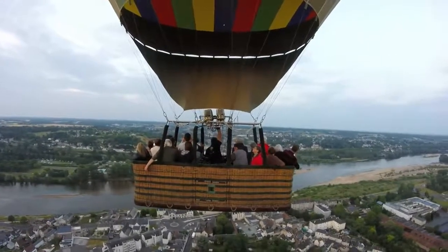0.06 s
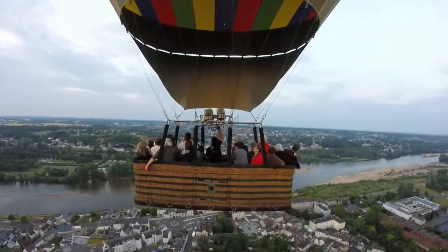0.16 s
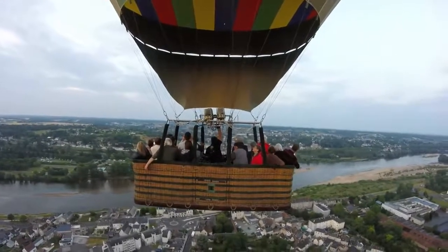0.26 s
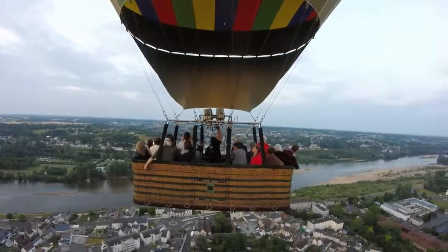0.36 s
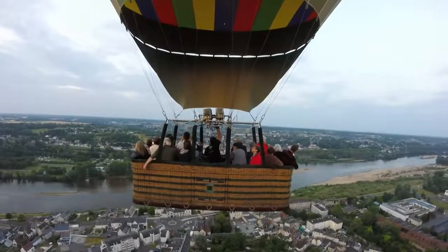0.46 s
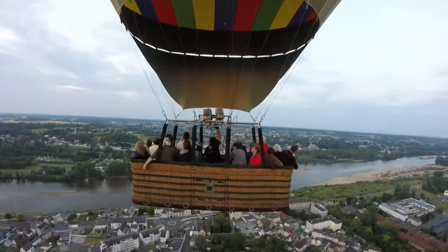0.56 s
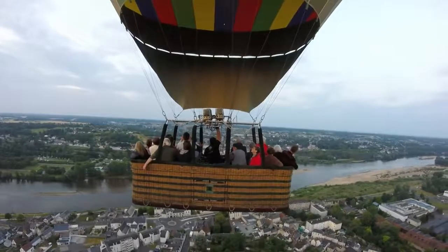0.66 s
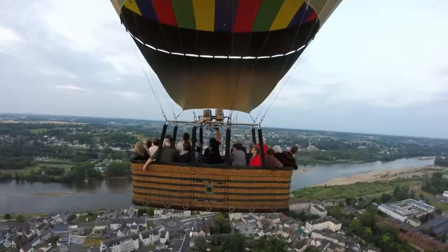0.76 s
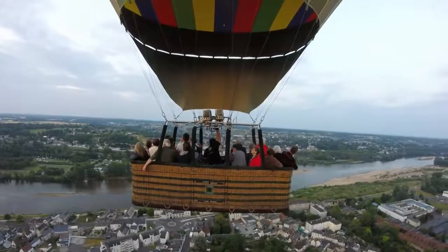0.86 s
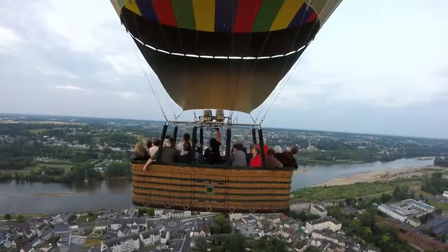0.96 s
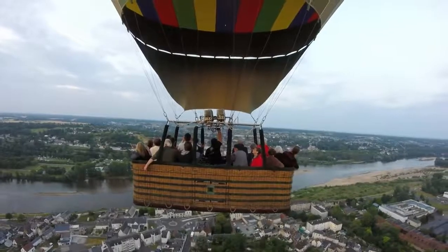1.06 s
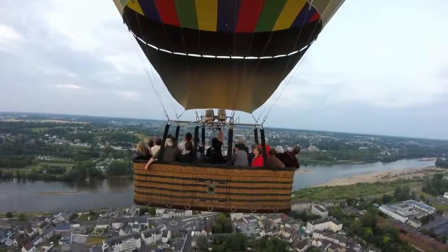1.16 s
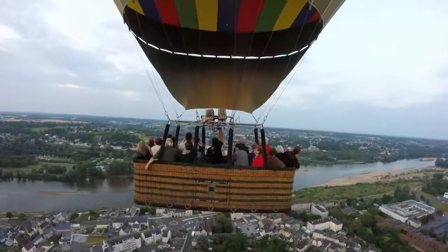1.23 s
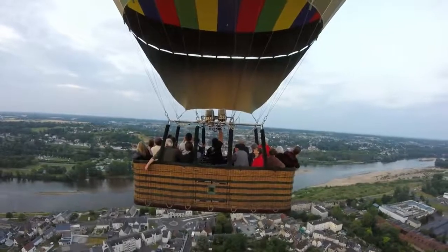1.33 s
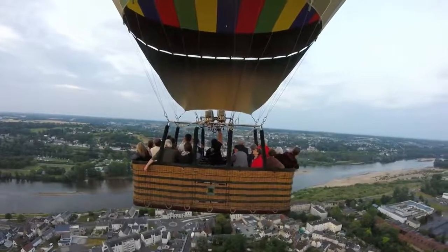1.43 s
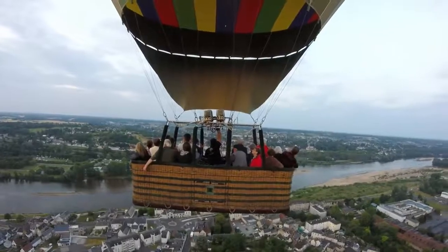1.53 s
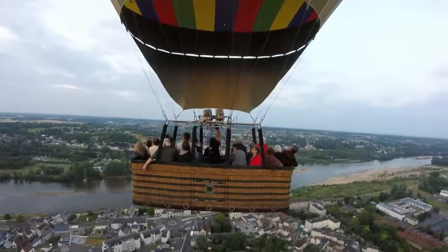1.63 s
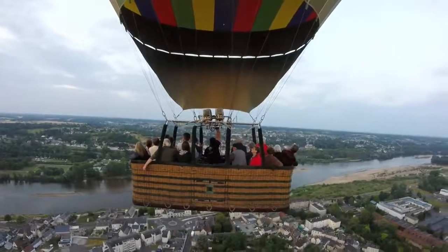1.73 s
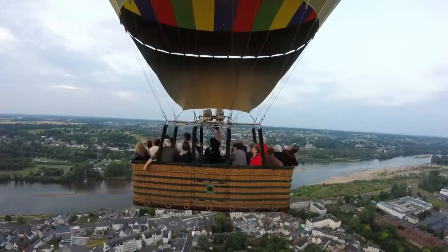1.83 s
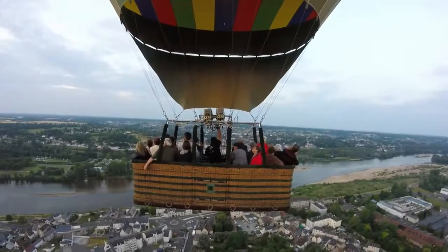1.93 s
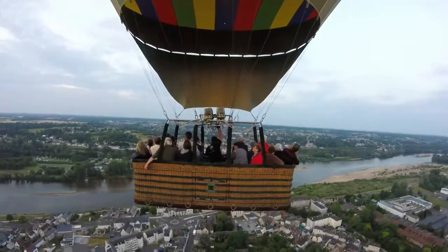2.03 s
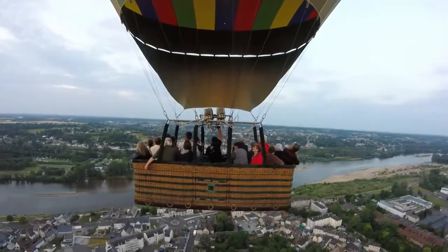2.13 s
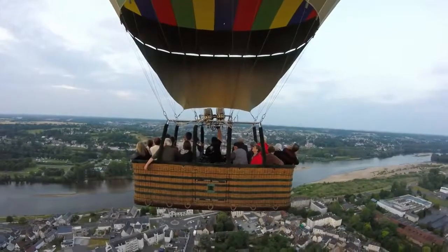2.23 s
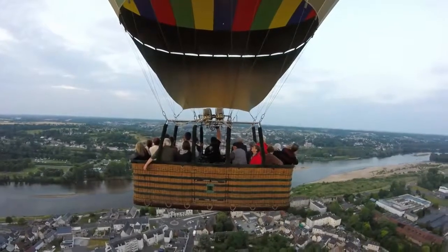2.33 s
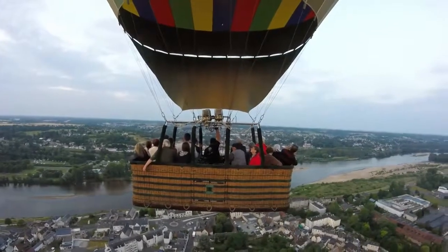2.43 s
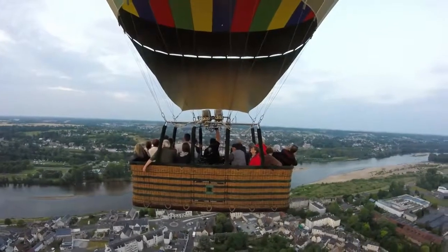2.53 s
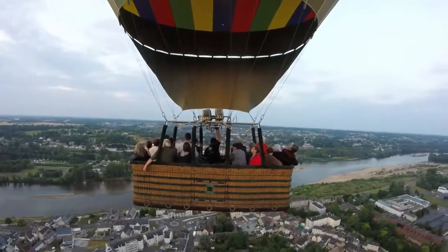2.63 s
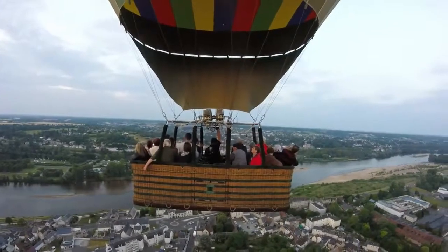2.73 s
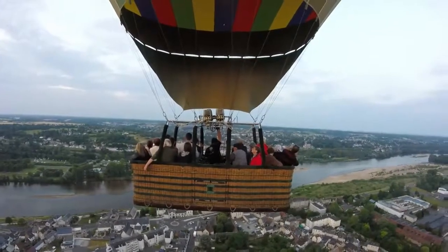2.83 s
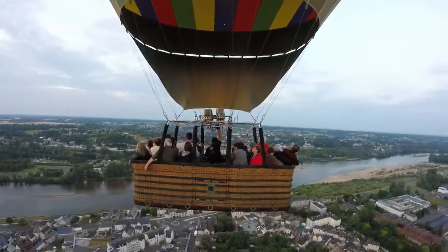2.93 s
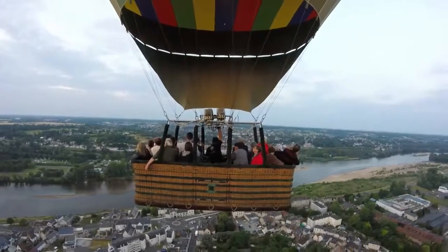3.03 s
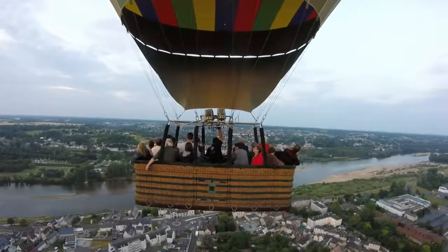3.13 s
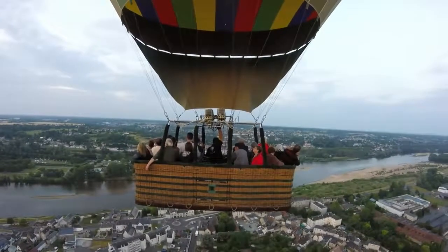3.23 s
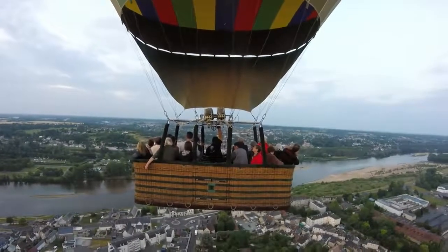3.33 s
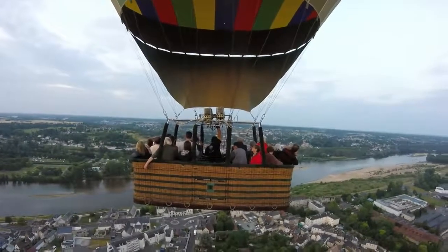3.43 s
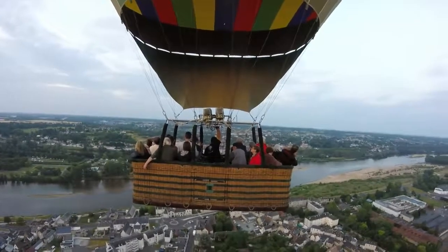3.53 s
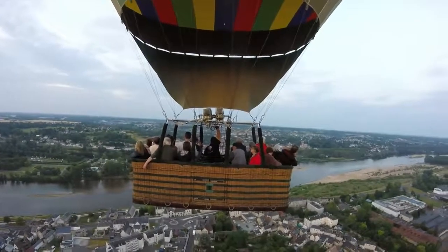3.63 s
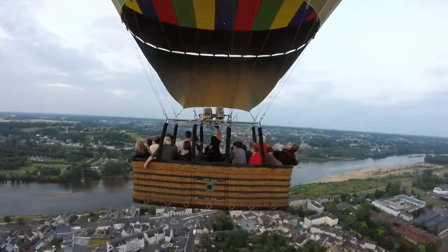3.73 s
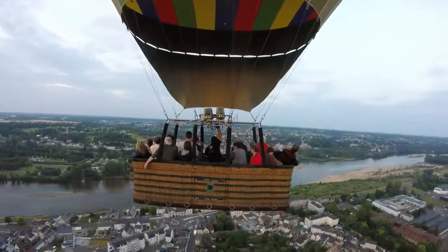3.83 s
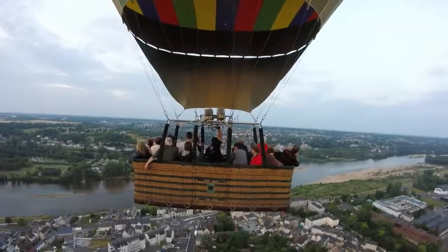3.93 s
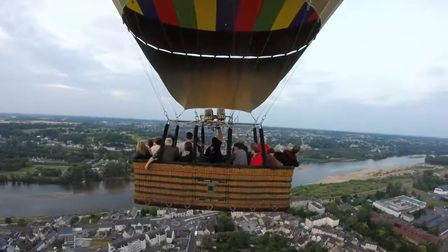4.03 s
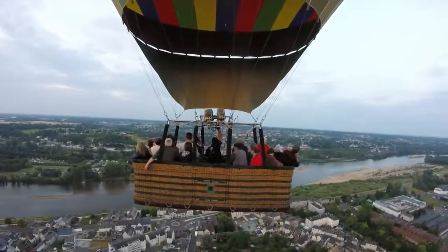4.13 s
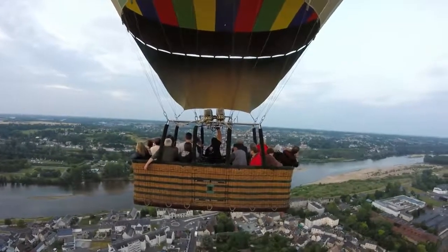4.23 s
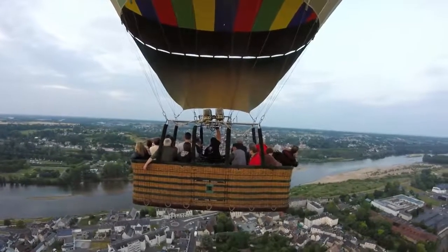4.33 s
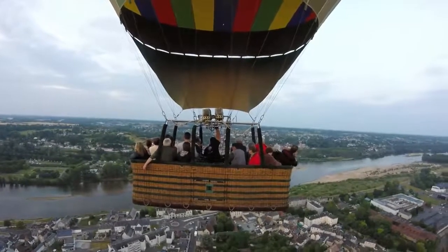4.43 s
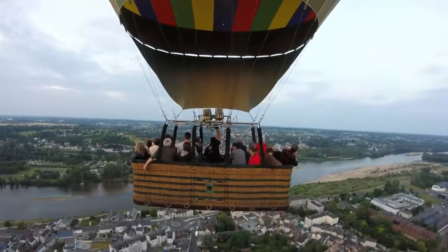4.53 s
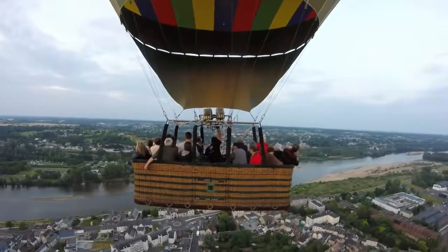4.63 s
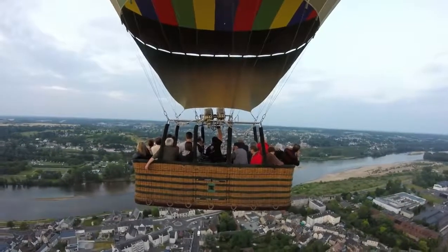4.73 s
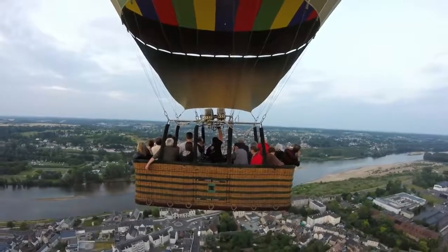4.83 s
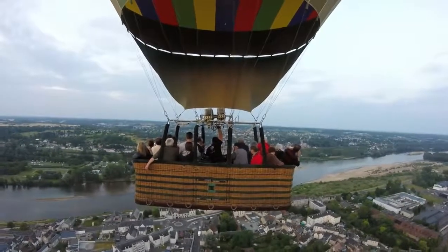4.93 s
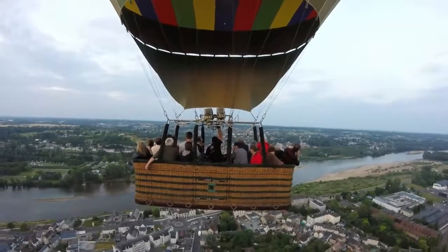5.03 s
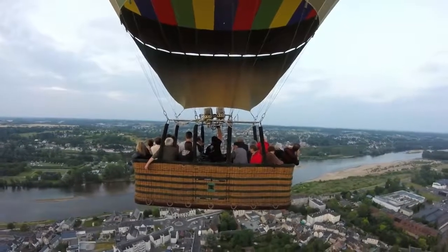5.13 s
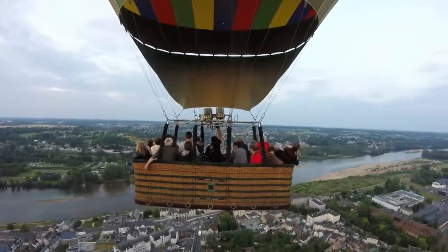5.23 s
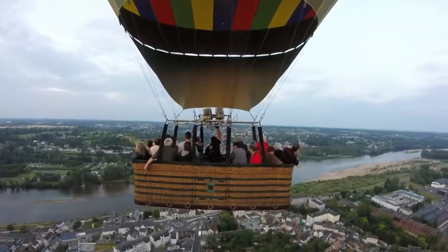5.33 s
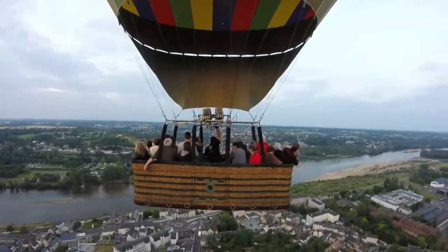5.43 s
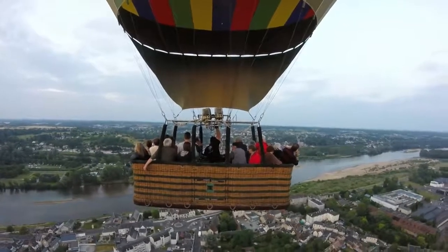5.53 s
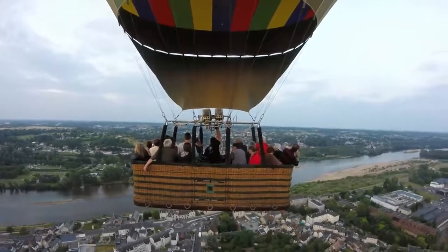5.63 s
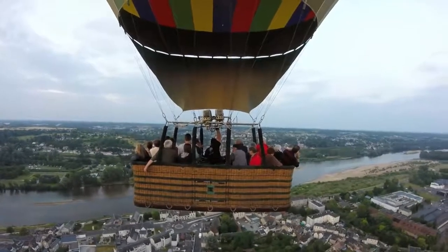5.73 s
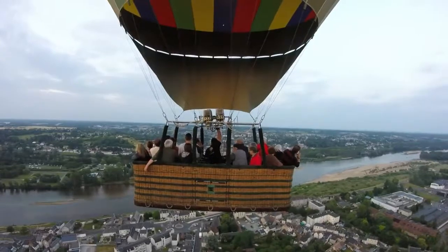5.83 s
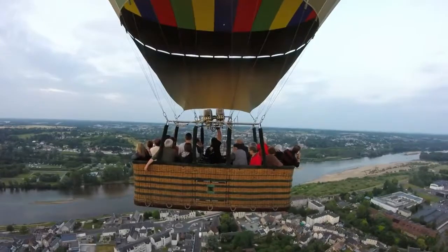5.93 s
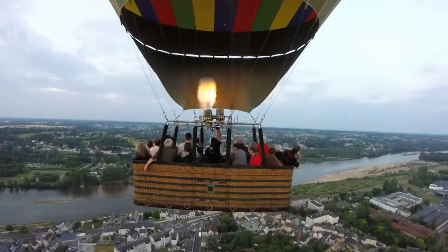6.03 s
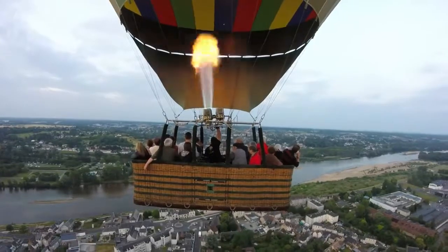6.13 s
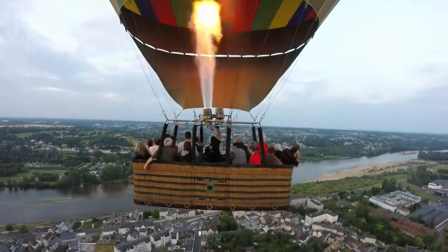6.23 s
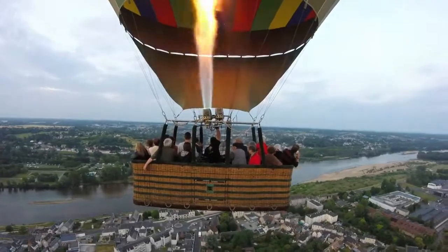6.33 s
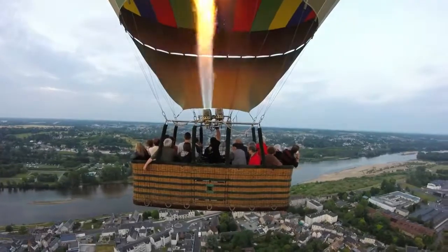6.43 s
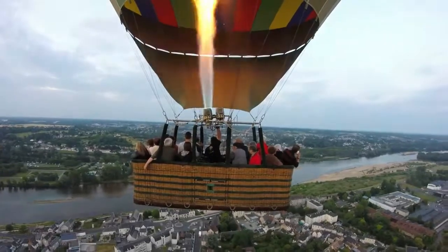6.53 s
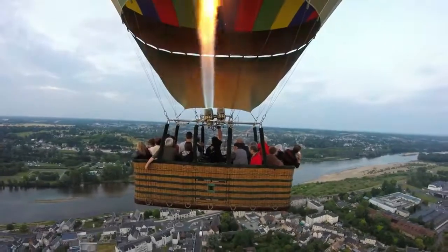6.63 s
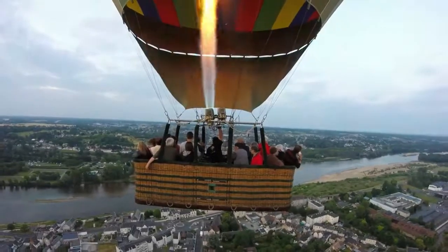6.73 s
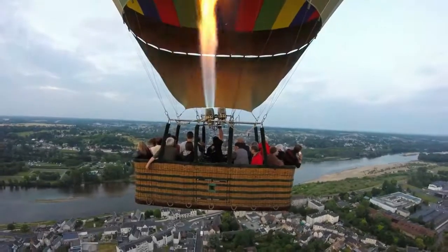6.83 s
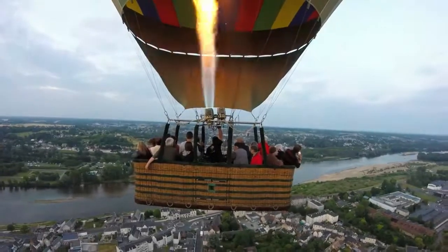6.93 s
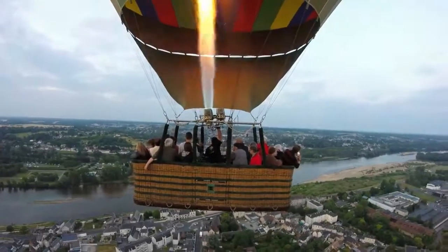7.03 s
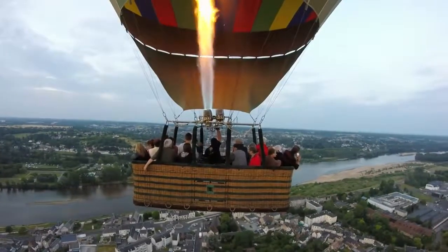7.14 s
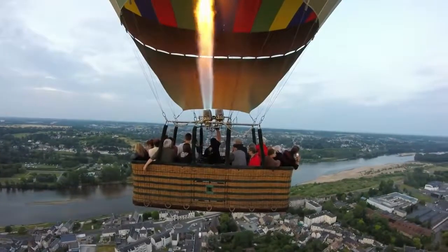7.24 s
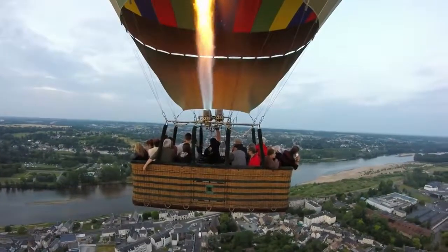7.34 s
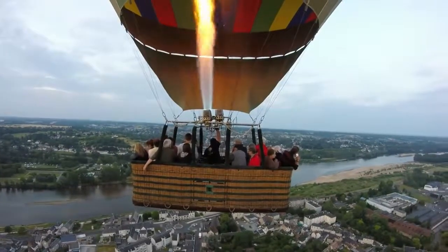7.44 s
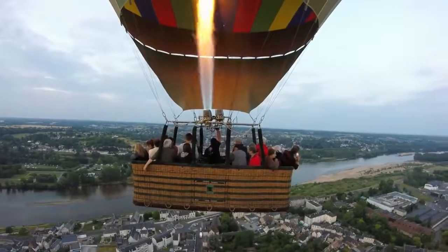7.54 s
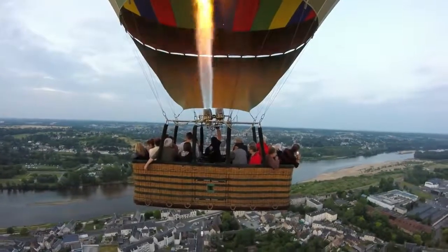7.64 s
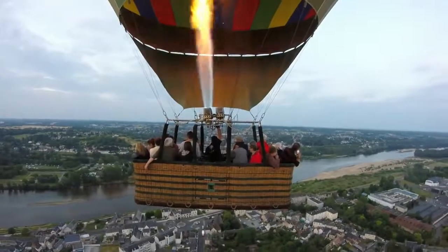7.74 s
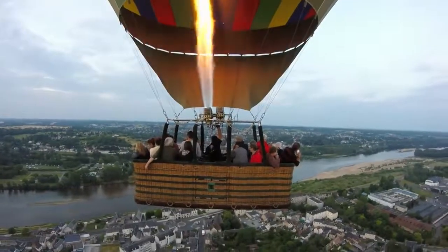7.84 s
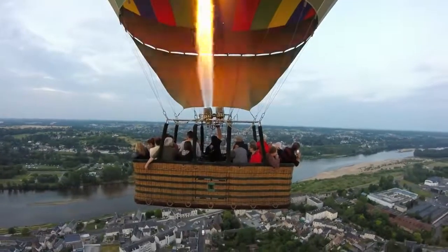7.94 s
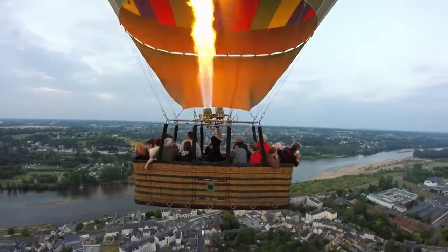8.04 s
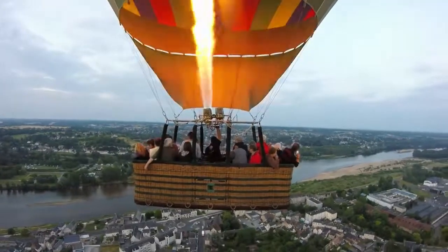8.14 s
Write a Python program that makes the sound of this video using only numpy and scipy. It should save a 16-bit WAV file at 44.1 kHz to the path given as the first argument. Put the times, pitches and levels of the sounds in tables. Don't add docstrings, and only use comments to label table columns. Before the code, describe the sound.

Six seconds of hushed distant town and small birds beside a soft pilot hiss, broken by a sudden, very loud hot-air balloon burner blast.

```python
import sys
import numpy as np
from scipy import signal
from scipy.fft import rfft, irfft, next_fast_len
from scipy.io import wavfile
from scipy.ndimage import uniform_filter1d, map_coordinates

SR = 44100
rng = np.random.default_rng(int(sys.argv[2]) if len(sys.argv) > 2 else 0)


def dump_mix(stems):
    frames = np.atleast_2d(stems).T
    limited = np.clip(frames, -1, 1)
    pcm = np.round(limited * 32767).astype(np.int16)
    wavfile.write(sys.argv[1], SR, pcm)


def convert_level_to_amplitude(level_db):
    exponent = np.asarray(level_db, float) / 20
    return 10 ** exponent


N = 360297


def unit(x):
    return x / np.sqrt(np.mean(x ** 2) + 1e-20)


def curves(rows):
    s, *cols = np.transpose(rows)
    return [np.interp(np.arange(N) / SR, s, c) for c in cols]


def wobble(rate_hz):
    knots = rng.standard_normal(int(N * rate_hz / SR) + 4)
    return map_coordinates(knots, [np.arange(N) * rate_hz / SR])


def coloured(x, spectrum):
    m = next_fast_len(N + 8192)
    hz, db = np.transpose(spectrum)
    log_hz = np.log(np.fft.rfftfreq(m, 1 / SR) + 1)
    gain = convert_level_to_amplitude(np.interp(log_hz, np.log(hz + 1), db, -120, -120))
    return unit(irfft(rfft(x, m) * gain, m)[:N])


def patchy(depth_db):
    z = signal.stft(rng.standard_normal(N), nperseg=512)[2]
    field = uniform_filter1d(rng.standard_normal(z.shape), size=6, axis=0)
    field = uniform_filter1d(field, size=12, axis=1)
    return signal.istft(z * convert_level_to_amplitude(depth_db * unit(field)), nperseg=512)[1][:N]


def town():
    # hz, db_per_hz
    rumble_spectrum = [(12, -46), (20, -26), (37, -2.5), (59, -1), (376, -7), (412, -8.5), (503, -8),
                       (800, -14.5), (1040, -22.5), (1760, -120)]
    tyre_spectrum = [(290, -32), (500, -11), (800, -8), (1100, -7), (1950, -10), (2400, -16.5), (2700, -38),
                     (4000, -55)]
    # time_s, level_db
    traffic = [
        (0.0, -57.5),
        (0.48, -56.5),
        (0.7, -54),
        (1.7, -55),
        (2.1, -56.5),
        (2.7, -56.5),
        (5.2, -56.5),
        (5.55, -58),
        (6, -58),
    ]
    # time_s, level_db
    engine = [
        (4.2, -70),
        (4.6, -50),
        (4.88, -49),
        (5, -60),
        (5.1, -42),
        (5.22, -58),
        (5.4, -45),
        (5.55, -54),
        (6, -47),
    ]
    t = np.arange(N) / SR
    tyre_db, second_db = curves(traffic)[0], curves(engine)[0]
    rumble = convert_level_to_amplitude(-44.7 + 0.5 * wobble(14)) * coloured(patchy(depth_db=0.7), rumble_spectrum)
    tyres = convert_level_to_amplitude(tyre_db + 0.74 * wobble(25)) * coloured(patchy(depth_db=0.65), tyre_spectrum)

    firing_hz, slows_s, sag_hz_per_s = 129, 5.4, 10.5
    hz = firing_hz - sag_hz_per_s * np.maximum(t - slows_s, 0)
    turn = 2 * np.pi * np.cumsum(hz + 1.1 * wobble(10)) / SR
    third_peak_db, load_s, load_db_per_s, ease_db_per_s = -50.5, 5.3, 70, 8
    third_db = third_peak_db - load_db_per_s * np.maximum(load_s - t, 0)
    third_db = third_db - ease_db_per_s * np.maximum(t - load_s, 0)
    second = convert_level_to_amplitude(second_db + 1.5 * wobble(14)) * np.sin(2 * turn)
    third = convert_level_to_amplitude(third_db + 1.5 * wobble(14)) * np.sin(3 * turn)

    fan_hz, fan_db, fan_silent_s = 450, -58, 4.8
    fan_phase = 2 * np.pi * np.cumsum(fan_hz + 4.31 * wobble(8.4)) / SR
    fan = convert_level_to_amplitude(fan_db + 2.4 * wobble(5.74)) * np.sin(fan_phase)
    return rumble + tyres + second + third + np.clip(fan_silent_s - t, 0, 1) * fan


def basket():
    # hz, db_per_hz
    pilot_spectrum = [(1400, -19), (2300, -2.5), (2860, -3.5), (3430, -2.5), (4800, -8), (6500, -12.5),
                      (7100, -11.5), (8000, -14), (8920, -12.5), (10500, -22), (14500, -28), (15300, -33),
                      (15750, -44)]
    # start_s, peak_db
    wicker = [
        (0.1639, -53),
        (2.0751, -53),
        (2.1529, -56),
        (4.4178, -49.5),
    ]
    ticks, t = np.zeros(N), np.arange(SR // 20) / SR
    decay_s, attack_s = 0.076, 0.002
    for s, db in wicker:
        envelope = convert_level_to_amplitude(db - 1.5 - 60 * t / decay_s) * (1 - np.exp(-t / attack_s))
        ticks[round(s * SR):][:len(t)] += envelope * rng.standard_normal(len(t))
    bright = signal.butter(4, [6800, 10200], "band", fs=SR, output="sos")
    pilot = convert_level_to_amplitude(-63.5 + 0.38 * wobble(30)) * coloured(patchy(depth_db=0.6), pilot_spectrum)
    return pilot + signal.sosfilt(bright, ticks)


def note(out_len, start_hz, end_hz, flutter):
    u = np.linspace(0, 1, out_len)
    phase = 2 * np.pi * np.cumsum(start_hz + (end_hz - start_hz) * u) / SR
    shake, fading = np.cumsum(rng.standard_normal((2, out_len)), axis=1)
    whistle = np.cos(0.57 * flutter * fading) * np.sin(phase + flutter * shake)
    return np.sin(np.pi * u) * unit(whistle)


def birds():
    # middle_s, start_hz, level_db
    chirps = [(.115, 4500, -62), (.135, 4190, -61), (.19, 3530, -65), (.39, 4900, -68), (.82, 4800, -65),
              (1.08, 4400, -66), (1.235, 5200, -67), (1.25, 4170, -61), (1.3, 3700, -63), (2.14, 5100, -71),
              (2.22, 3800, -66), (2.46, 4900, -64), (2.54, 4100, -64), (2.6, 3700, -62), (2.625, 4600, -63),
              (2.7, 2950, -64), (3.08, 3900, -65), (3.19, 4110, -63), (3.24, 3770, -62), (3.41, 3700, -61),
              (3.665, 4700, -63), (4.3, 3000, -65), (4.745, 4770, -60), (5.03, 3600, -65),
              (5.35, 3550, -62), (5.74, 5500, -66)]
    # middle_s, start_hz, length_s, level_db
    whistles = [(.46, 3350, .04, -66), (1.098, 3750, .08, -63), (1.49, 3500, .04, -66),
                (1.6, 4900, .05, -67), (1.698, 3750, .04, -63), (2.054, 3500, .065, -64),
                (2.45, 3050, .07, -64), (2.835, 3550, .06, -61.5), (2.885, 3280, .07, -61),
                (3.35, 3950, .05, -65), (3.6, 4400, .05, -67), (3.89, 3440, 0.086, -63),
                (4.061, 3650, .06, -63), (4.085, 3400, .04, -65), (4.46, 5120, 0.053, -64),
                (4.68, 3480, .054, -67), (4.79, 3500, 0.073, -66), (5.108, 3720, .06, -70),
                (5.27, 4600, .06, -68)]
    # middle_s, start_hz, end_over_start, level_db
    rises = [
        (2.41, 2700, 1.08, -66),
        (3.335, 4500, 1.1, -62),
        (3.39, 3600, 1.2, -62),
        (5.785, 3700, 1.14, -63),
        (5.965, 3400, 1.09, -69),
    ]
    # middle_s, pitch_hz, length_s, level_db
    dove = [
        (.64, 490, .13, -52),
        (2.7, 495, .11, -50.5),
        (3.535, 505, .11, -49.5),
        (4.07, 580, .1, -57),
        (5.37, 600, .1, -54),
    ]
    chirp_s, chirp_fall, whistle_fall = 0.037, 0.86, 0.97
    near = [(s, hz, hz * chirp_fall, chirp_s, db) for s, hz, db in chirps]
    near += [(s, hz, hz * whistle_fall, length_s, db) for s, hz, length_s, db in whistles]
    near += [(s, hz, hz * rise, chirp_s, db) for s, hz, rise, db in rises]

    notes_per_s, middle_hz, far_db = 90, 3750, -77
    when, pitch, glide, length, level = rng.random((5, notes_per_s * 6))
    hz = middle_hz * 1.7 ** (pitch - 0.5)
    far = np.c_[0.1 + 6 * when, hz, hz * (0.86 + 0.18 * glide), 0.03 + 0.04 * length, far_db + 5 * level]

    calls = [(*call, 0.11) for call in [*near, *far]]
    calls += [(s, 1.01 * hz, 0.99 * hz, length_s, db, 0.0067) for s, hz, length_s, db in dove]
    direct = np.zeros(N)
    for s, start_hz, end_hz, length_s, db, flutter in calls:
        n = round(length_s * SR)
        direct[round(s * SR) - n // 2:][:n] += convert_level_to_amplitude(db) * note(n, start_hz, end_hz, flutter)
    t = np.arange(SR // 4) / SR
    echoes = rng.standard_normal(len(t)) * convert_level_to_amplitude(-60 * t / 0.31)
    echoes = echoes / np.linalg.norm(echoes)
    return direct + convert_level_to_amplitude(-3.5) * signal.fftconvolve(direct, echoes)[:N]


def flame_db(base_db, follows, rise_s):
    # time_s, level_db
    flow = [
        (6.07, 0),
        (6.11, -3),
        (6.17, 0),
        (6.38, 4),
        (6.47, 1),
        (6.85, .5),
        (7.3, -1.5),
        (8.15, -0.5),
    ]
    # middle_s, level_db
    flares = [
        (6.54, 1.5),
        (6.93, 3.5),
        (7.15, 2.5),
        (7.345, 2),
        (7.63, 2),
        (7.88, 1.5),
        (7.96, 1.5),
    ]
    t = np.arange(N) / SR
    valve_s, opening_power, flare_s = 6.022, 1.7, 0.03
    swing_db = curves(flow)[0]
    for s, db in flares:
        swing_db = swing_db + db * np.exp(-0.5 * ((t - s) / flare_s) ** 2)
    opening = np.clip((t - valve_s) / rise_s, 1e-6, 1)
    return base_db + follows * swing_db + 20 * opening_power * np.log10(opening)


def burner():
    # hz, db_per_hz
    roar_spectrum = [(15, -40), (25, -8.5), (86, -0.5), (178, 1), (335, 0), (673, -7), (840, -20),
                     (1100, -25), (1430, -34.5), (2420, -120)]
    rasp_spectrum = [(470, -27), (800, -4.5), (1540, -7), (1960, -6), (2790, -17), (3050, -24), (4200, -49),
                     (5460, -53), (9240, -120)]
    jet_spectrum = [(2100, -24), (3400, -9.5), (4200, -12.5), (5450, -5), (6600, -9.5), (7100, -3.5),
                    (8400, 0.5), (8850, -4.5), (9150, -11), (9400, -30)]
    upper_jet_spectrum = [(8800, -30), (9250, -3.5), (9900, -1), (10300, -5.5), (13000, -9), (13400, -12),
                          (13800, -7), (14700, -10), (15100, -14), (15700, -18), (15760, -60)]
    roar_db = flame_db(-14, follows=0.87, rise_s=0.042)
    rasp_db = flame_db(-31.5, follows=0.78, rise_s=0.03)
    hiss_db = flame_db(-37, follows=0.56, rise_s=0.051)

    surge_s, surge_peak_db, surge_fade_s = 6.14, 2.5, 0.31
    since_s = np.arange(N) / SR - surge_s
    surge_db = surge_peak_db * np.clip(since_s / 0.02, 0, 1) * np.exp(-np.abs(since_s) / surge_fade_s)
    rasp_db, hiss_db = rasp_db + 0.55 * surge_db, hiss_db + surge_db

    pockets_per_s = 900
    pockets = (rng.random(N) < pockets_per_s / SR) * convert_level_to_amplitude(3.7 * rng.exponential(size=N))
    burning = 0.5 * unit(pockets - pockets.mean()) + patchy(depth_db=-0.03)
    flicker = wobble(22)
    roar = convert_level_to_amplitude(roar_db + 0.17 * flicker + 0.57 * wobble(40)) * coloured(burning, roar_spectrum)
    rasp = convert_level_to_amplitude(rasp_db + 0.61 * flicker + 0.27 * wobble(60)) * coloured(burning, rasp_spectrum)
    jets = coloured(patchy(depth_db=0.7), jet_spectrum)
    jets = jets + convert_level_to_amplitude(-6.5) * coloured(patchy(depth_db=0.5), upper_jet_spectrum)
    hiss = convert_level_to_amplitude(hiss_db - 0.92 + 0.43 * flicker + 0.52 * wobble(70)) * jets
    return roar + rasp + hiss


def lighting():
    # middle_s, peak_db, width_ms
    pushes = [
        (6.0402, -17, 1.1),
        (6.0482, -3, 1.5),
        (6.054, -1.5, 2.3),
        (6.0597, -6, 1.1),
        (6.066, -12, 1.3),
        (6.0705, -7, 1.9),
    ]
    t, thump = np.arange(N) / SR, np.zeros(N)
    for s, db, width_ms in pushes:
        u = (t - s) * 1000 / width_ms
        thump += convert_level_to_amplitude(db) * (1 - u ** 2) * np.exp(-u ** 2 / 2)
    return thump


def with_band_gaps(x):
    # start_s, end_s, middle_hz, width_hz
    gaps = [
        (6.11, 6.27, 4130, 330),
        (6.12, 6.27, 10850, 220),
        (6.275, 6.315, 4500, 260),
        (6.32, 6.365, 4130, 260),
        (6.615, 6.66, 4500, 260),
        (6.87, 6.92, 4500, 260),
    ]
    hz, t, z = signal.stft(x, SR, nperseg=1024)
    for start_s, end_s, middle_hz, width_hz in gaps:
        z[np.ix_(np.abs(hz - middle_hz) < width_hz / 2, (t > start_s) & (t < end_s))] = 0
    return signal.istft(z, SR, nperseg=1024)[1][:N]


def scene():
    roar = burner()
    held = roar / (1 + np.abs(roar / 0.8) ** 4) ** (1 / 4)
    return np.tile(held + lighting() + town() + birds() + basket(), (2, 1))


def band_limit(x):
    return signal.sosfilt(signal.butter(12, 16080, fs=SR, output="sos"), x)


def record(dry):
    limited = with_band_gaps(dry[0] / (1 + np.abs(dry[0] / 1.05) ** 6) ** (1 / 6))
    mismatch = convert_level_to_amplitude(-42 + 5 * wobble(20)) * wobble(300) * limited
    return band_limit(np.array([limited + mismatch, limited - mismatch]))


dry = scene()
out = record(dry)
dump_mix(out)
```